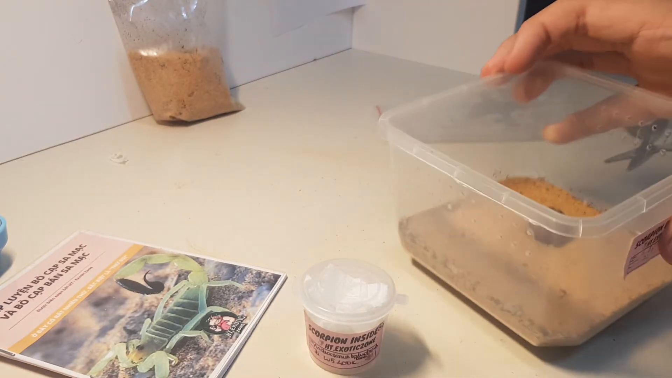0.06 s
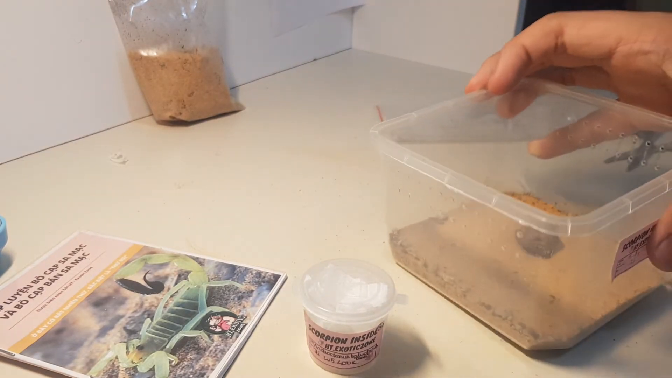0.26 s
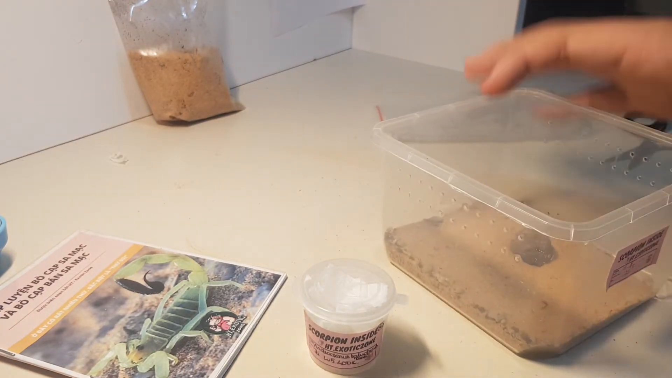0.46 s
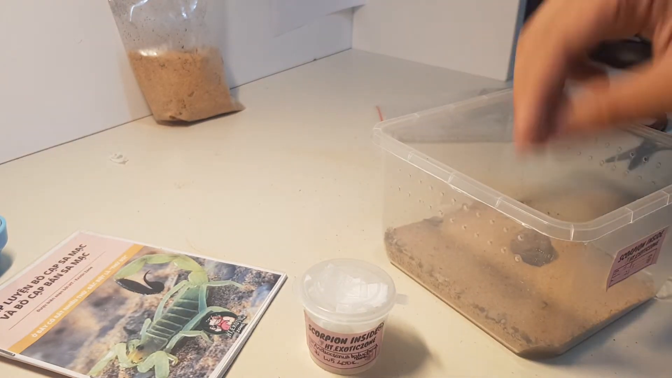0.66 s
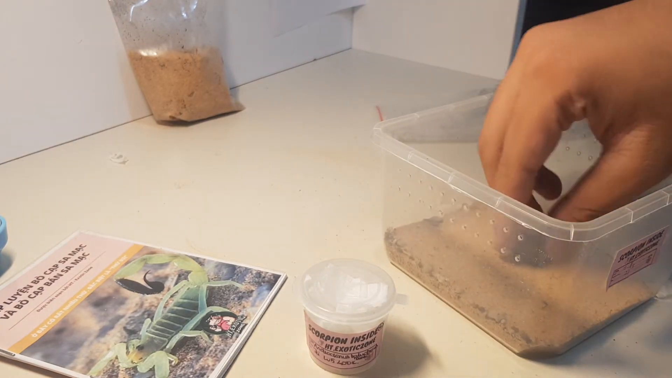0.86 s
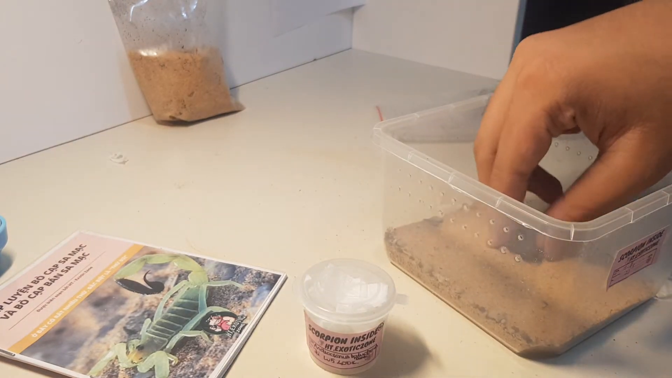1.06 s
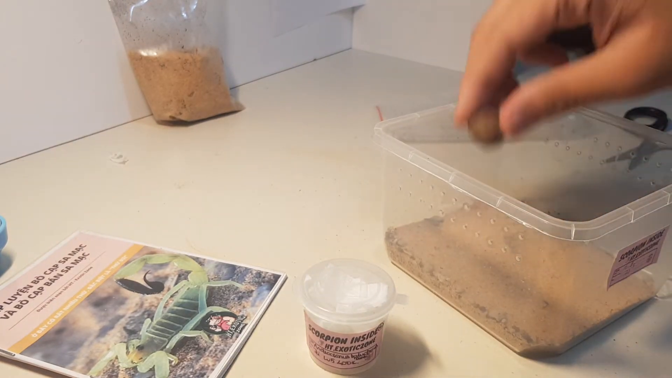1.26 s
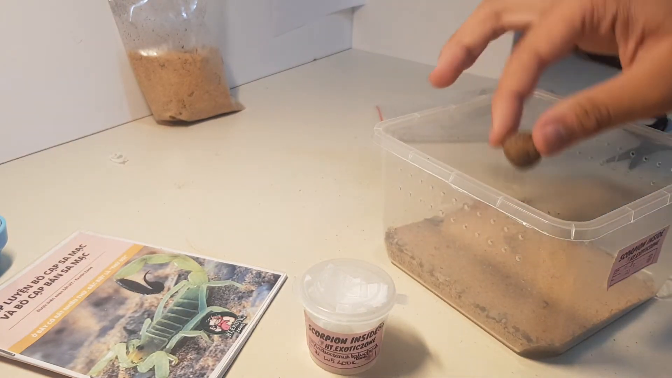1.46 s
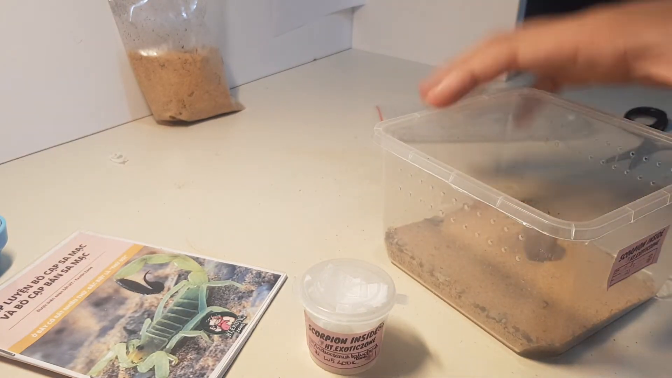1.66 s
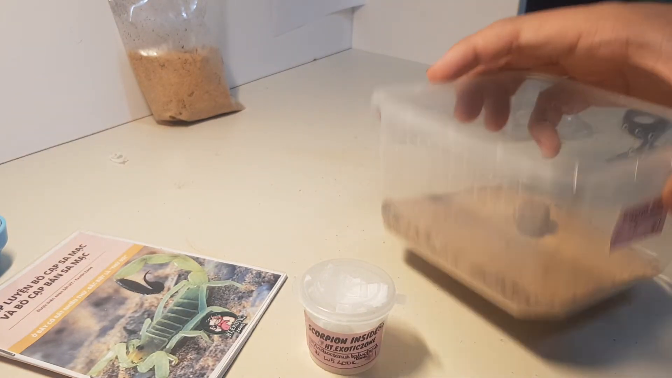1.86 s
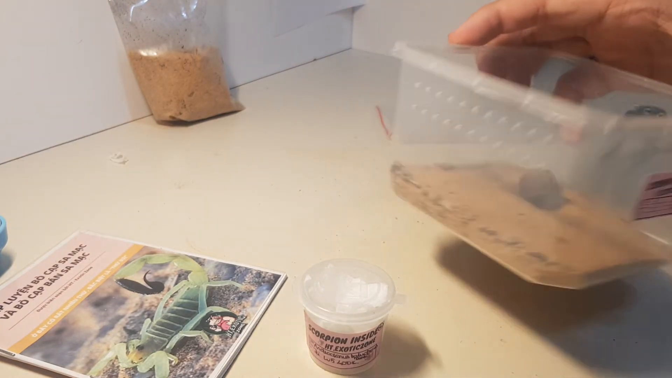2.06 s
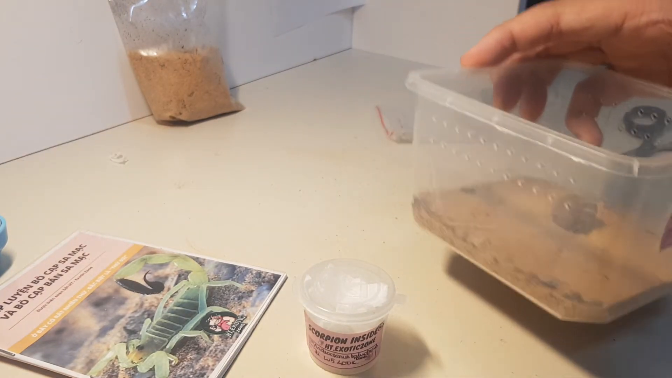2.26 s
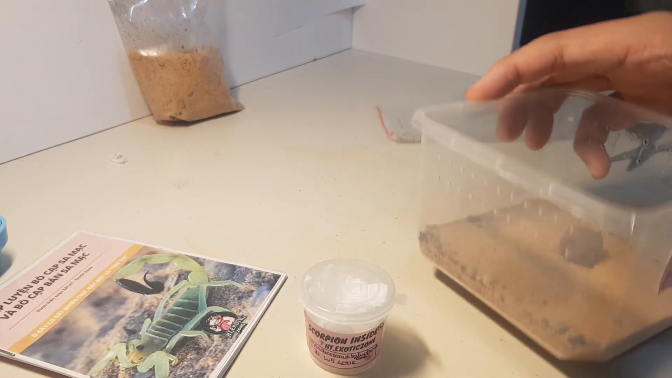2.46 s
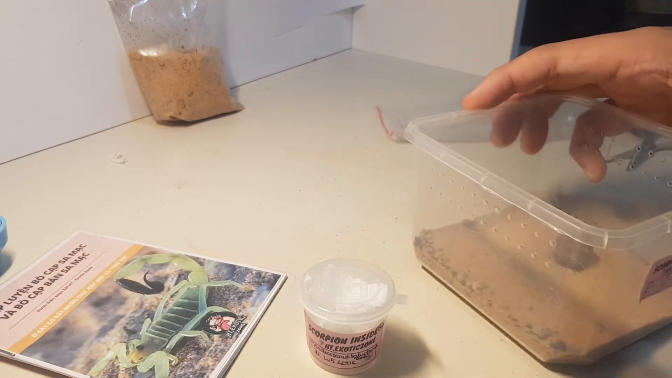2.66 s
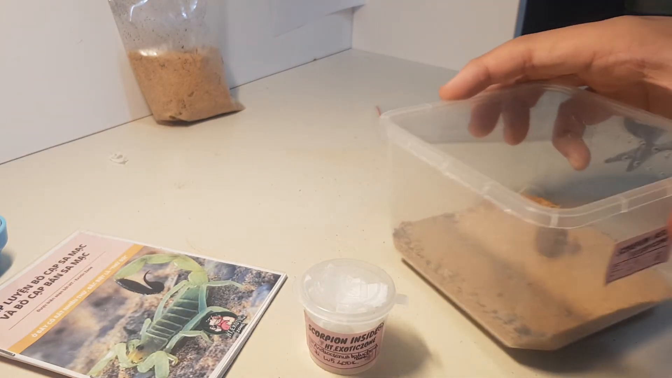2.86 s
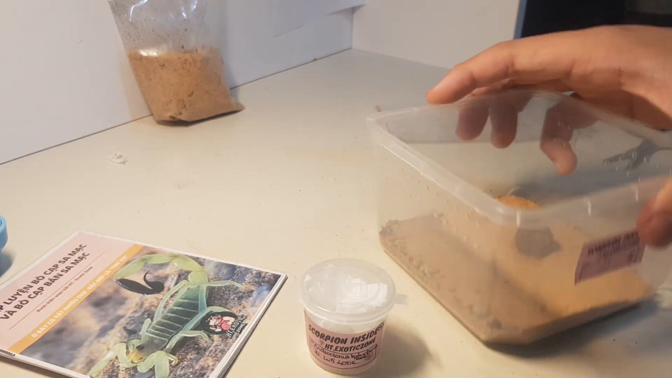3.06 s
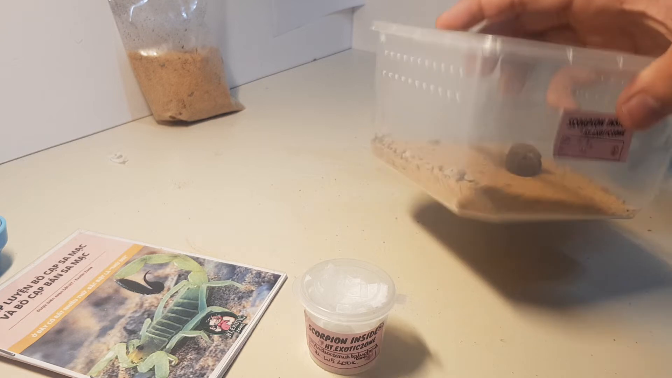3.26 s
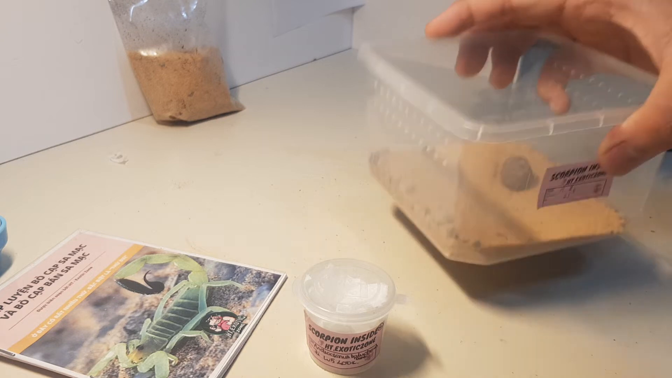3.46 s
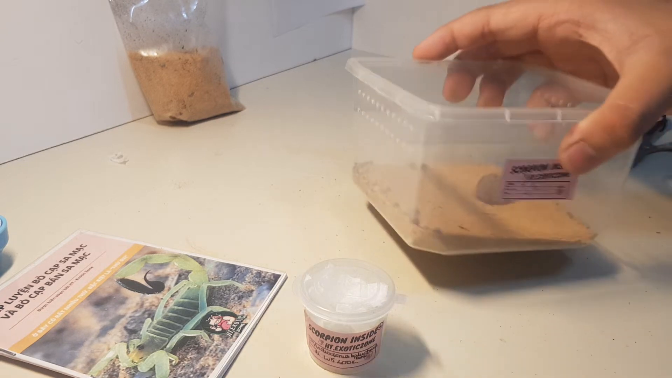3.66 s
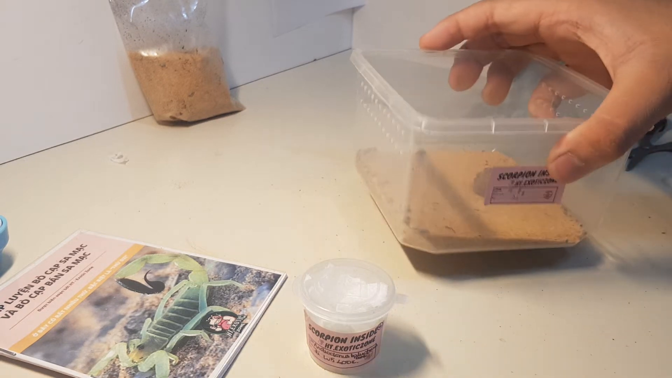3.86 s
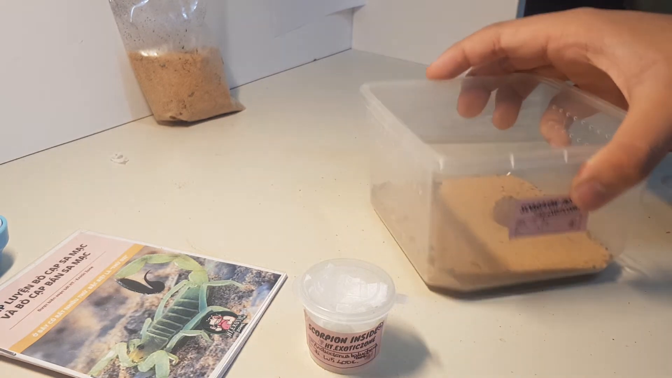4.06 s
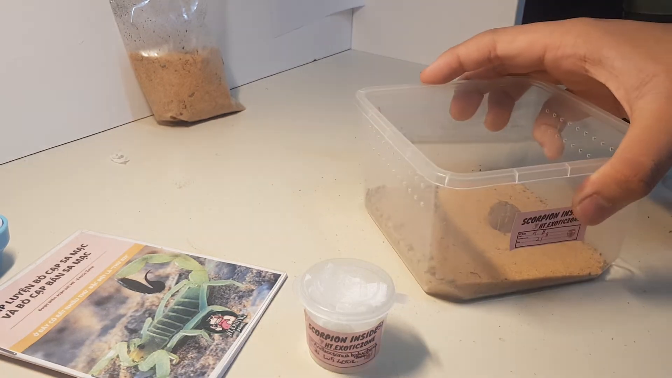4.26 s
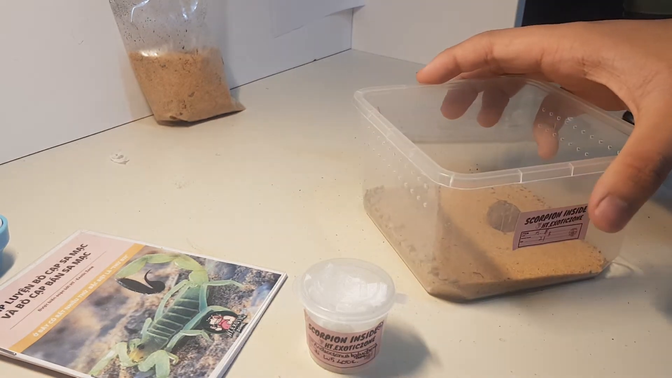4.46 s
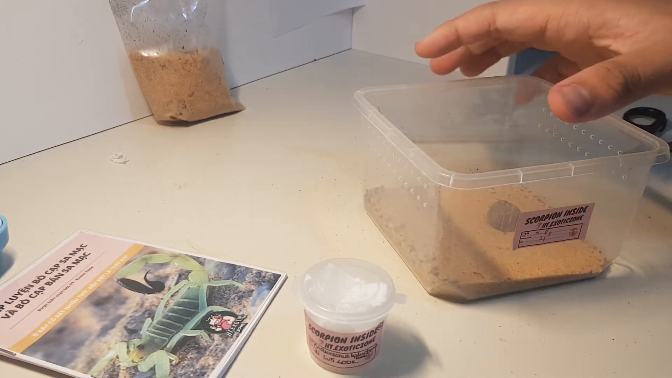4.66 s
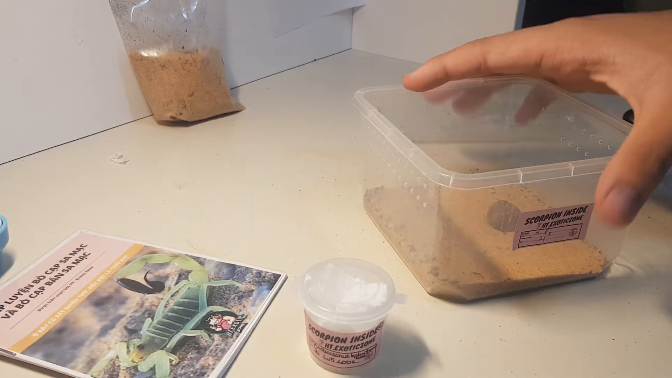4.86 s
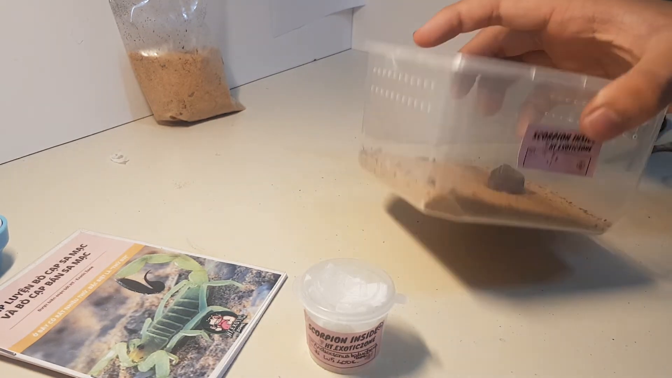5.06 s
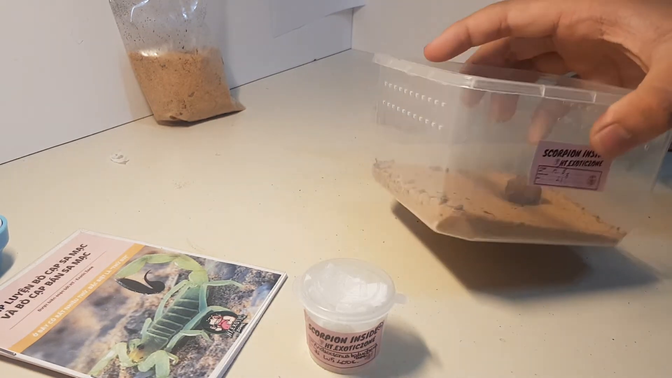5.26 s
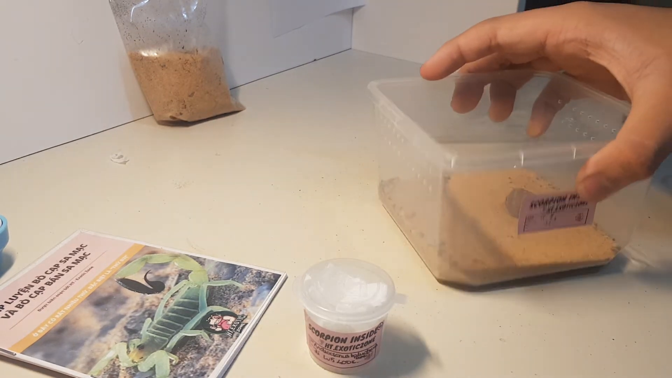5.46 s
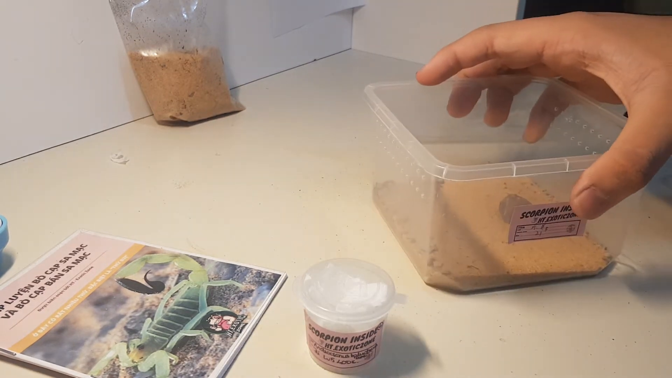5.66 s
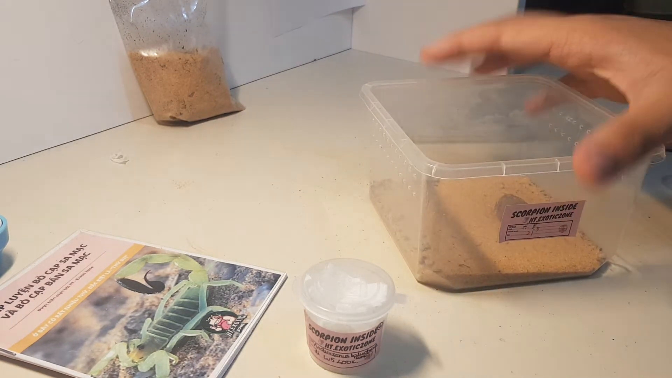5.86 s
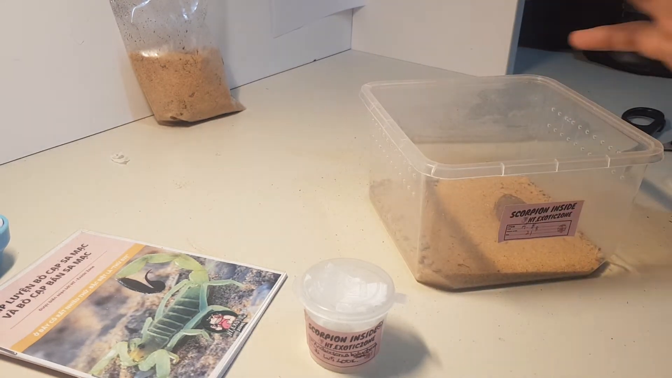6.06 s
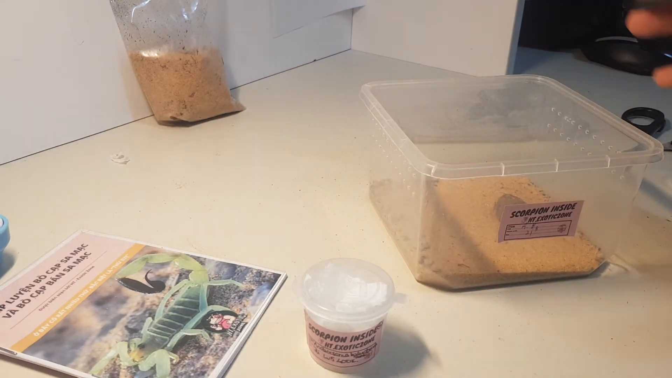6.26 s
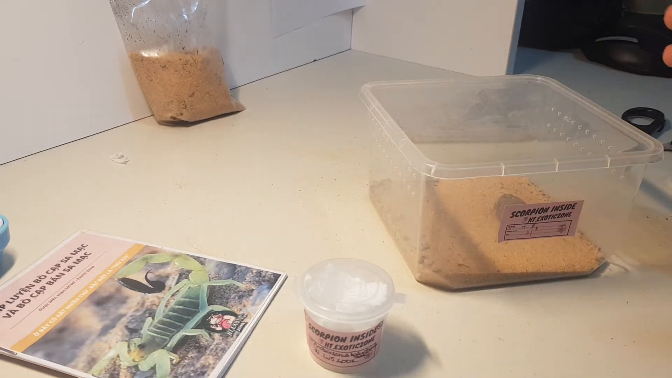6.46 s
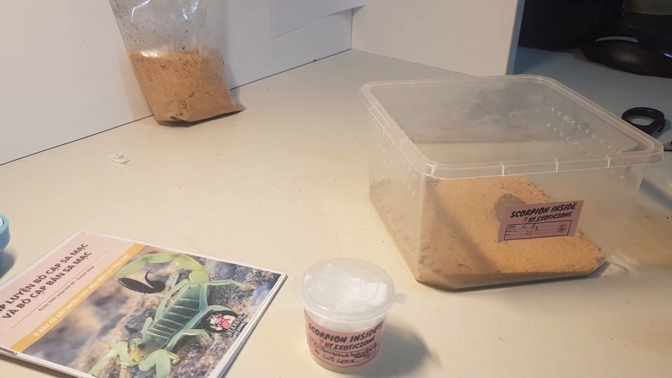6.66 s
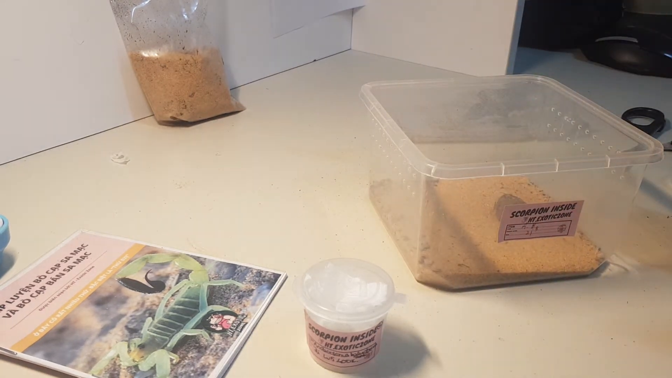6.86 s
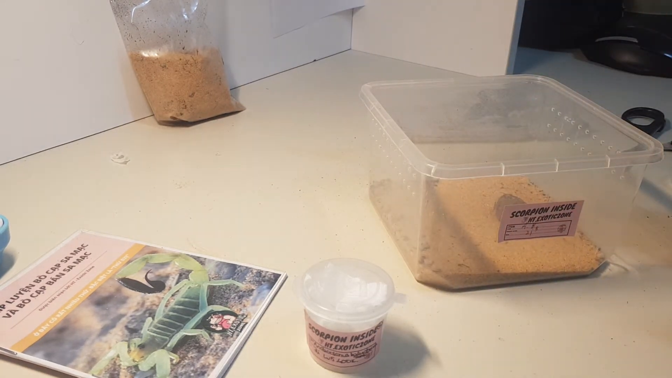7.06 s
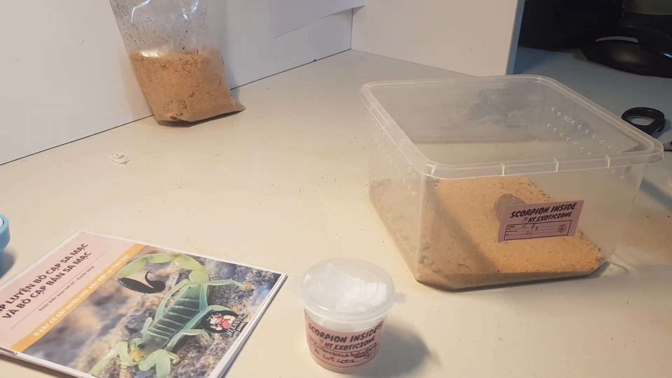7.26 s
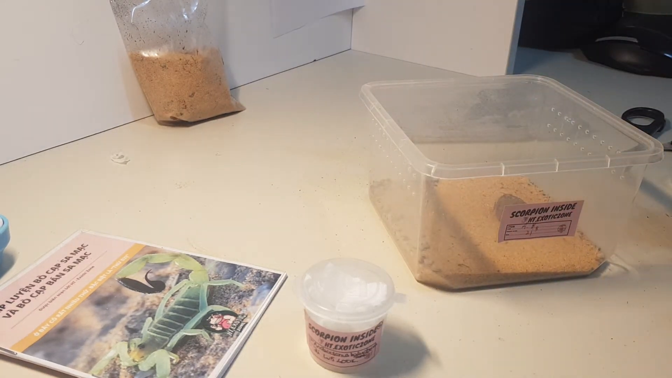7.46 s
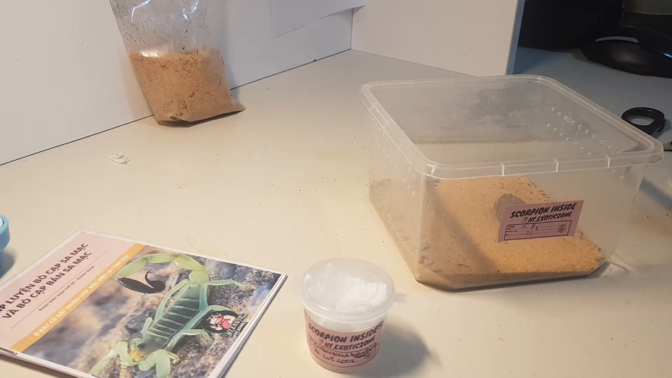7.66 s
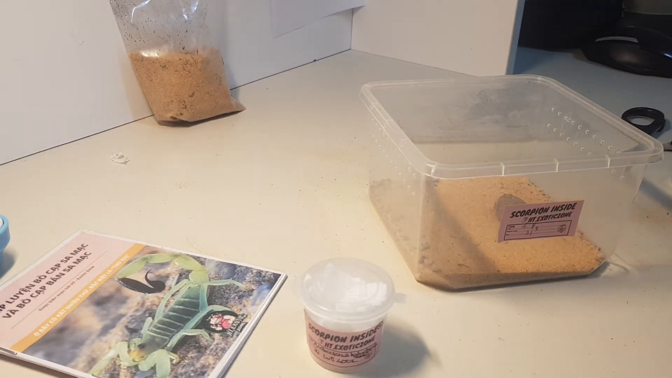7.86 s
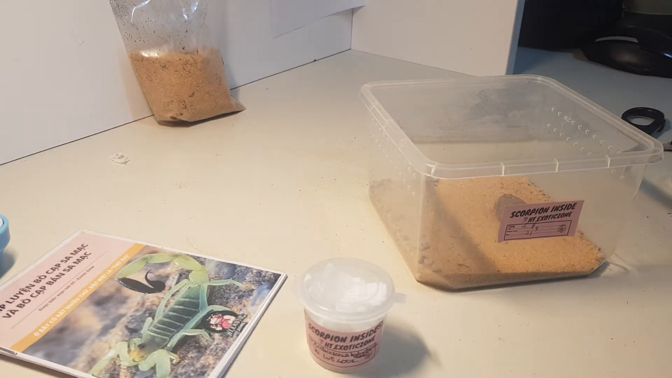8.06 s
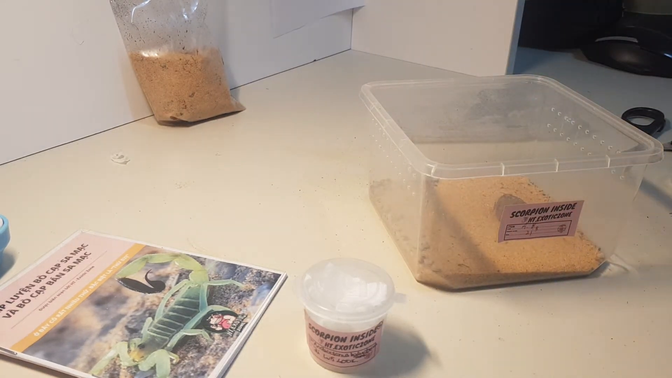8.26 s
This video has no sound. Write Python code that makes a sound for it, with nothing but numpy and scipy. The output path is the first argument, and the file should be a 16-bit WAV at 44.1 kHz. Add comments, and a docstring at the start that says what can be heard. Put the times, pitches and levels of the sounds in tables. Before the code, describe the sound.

Hollow knocks and small rim clicks from a plastic tub of sand moved around a desk, with mains hum and a fan behind.

```python
"""A thin plastic tub with a little sand in it is lifted, turned and set down on a desk in a small room.
Its base knocks, ringing the walls and the air inside; its rim clicks and scrapes under the fingers
and the sand trickles. A few dry ticks, a scuff and later soft bumps on the desk are heard too.
The tub sits just right of centre in the stereo pair, with quick reflections and a short room tail.
Mains hum and a small fan drone steadily behind, over a faint low rumble."""
import sys
import numpy as np
from scipy import signal
from scipy.fft import rfft, irfft
from scipy.io import wavfile

SR = 44100
rng = np.random.default_rng(int(sys.argv[2]) if len(sys.argv) > 2 else 0)


def transcribe(signal):
    """Save signal, clipped to [-1, 1], as a 16-bit WAV file at the path in sys.argv[1]."""
    frames = np.atleast_2d(signal).T
    limited = np.clip(frames, -1, 1)
    pcm = np.round(limited * 32767).astype(np.int16)
    wavfile.write(sys.argv[1], SR, pcm)


N = 366459
TIME = np.arange(N) / SR

# The tub lands, rocks and bounces; later, soft bumps sound on the desk. Hardness is the ring of the
# walls over the thump of the desk; hollowness is the boom of the air in the tub. The thump's pitch
# depends on where the blow lands; the grip damps the ring or lets it run.
# start_s, strength_db, hardness_db, hollowness_db, thump_semitones, ring_length_factor
KNOCKS = [(0.2604, -20, 1.5, -4.5, 2.5, 0.58), (0.299, -41, -15, -10, 0.5, 0.78),
          (0.383, -31, -5, -3, 3, 0.94), (0.42, -38.5, -17, 4.5, -1, 1.8),
          (0.441, -31.5, 10, -5, -2.5, 1.8), (0.444, -26, -6, 9.5, -2, 1.26), (0.451, -36, -4, -4, -7, 0.9),
          (0.522, -41, -14, -8, 3, 0.86), (0.819, -37, -7, 3.5, -8, 0.81), (1.142, -44.5, -18, 6.5, 0, 1.4),
          (1.625, -42.5, -24, 4, -3.5, 1.4), (1.648, -47.5, -17, 10.5, -0.5, 0.9),
          (1.746, -35.5, 8, -19, 4, 1.5), (1.757, -31, -7, 3, 1.5, 0.73), (1.773, -33, -12, 3, 0, 0.68),
          (1.787, -41.5, 14, -6, 1, 2.3), (2.588, -36.5, -7, 9.5, -2, 1.45),
          (2.986, -21.5, -3, -0.5, 1.5, 1), (2.996, -24.5, -8.5, -21, -1, 0.85),
          (3.005, -34, 1, -9, 0.5, 1), (3.022, -31, -11, -4, -3, 0.84), (3.042, -39.5, -15, -1, 0.5, 0.8),
          (3.063, -41, -16, -10, 0.5, 1.4), (3.098, -49, -3, 3, -5, 1.5), (3.441, -45.5, 6, 4, -7, 1.4),
          (3.721, -51.5, 18, 1, -17, 2), (4.128, -31, -17.5, -19, 2, 0.85), (4.166, -29.5, -9, 0, 0, 1.05),
          (4.192, -40, -13, -7, 8.5, 0.85), (4.928, -41.5, -6, 4, -2, 1.7), (5.211, -47.5, 27, 6, 5, 0.84),
          (5.381, -46.5, 16, -10, -11, 0.9), (5.53, -12.5, 1, -4, 0.5, 0.78),
          (5.539, -32.5, 1, 6, -2, 0.77), (5.552, -35, 3, 4, 2, 1), (5.567, -36, -12, -8, -0.5, 1.2),
          (5.591, -49, 5, -9, 3, 1), (5.609, -32, -20, -1, 1.5, 0.8), (5.64, -36, -20, -13, -3, 1.1),
          (5.662, -39.5, -26, 7.5, 2, 0.78), (5.679, -41, -23, -13, -1, 1),
          (5.876, -43, -14, -3, 4.5, 0.41), (6.399, -41, -14, -2, -4, 2.5), (6.437, -50, -14, 6, 2.5, 1.7),
          (6.48, -44, -3, 2, -7, 1.6), (6.733, -42.5, -10, 11, -4, 0.89), (6.752, -42.5, -24, -6, -10, 3.4),
          (7.557, -48, -5, 7, 1, 1.5), (7.844, -44.5, -13, 5, -6, 0.95), (8.097, -44, -8, 0.5, 2.5, 1.65)]
# Modes of the tub's base and thin walls: pitch_hz, gain_db, t60_s
BASE = [(500, -1, 0.025), (542.5, 7, 0.028), (635, 1.5, 0.028), (704, 0.5, 0.026)]
WALLS = [(740, 16, 0.039), (902, 9, 0.05), (892.5, 26, 0.032), (935, 24.5, 0.039), (1050, 12, 0.008),
         (1136, 12, 0.018), (1310, 8, 0.018), (1560, 8.5, 0.012), (1850, 6, 0.034), (1940, 7, 0.018),
         (2340, -1, 0.012), (3030, -16, 0.014)]
# Resonances of the rim, midrange and top end: pitch_hz, width_hz, gain_db
RIM = [(1000, 780, -10.5), (1840, 800, 0.5), (3230, 290, -0.5), (3960, 930, -4.5), (6590, 1640, -7.5)]
RIM_TOP = [(10840, 1830, 12.6), (13100, 2300, 11.5), (14700, 2400, 4.8)]


def knocks(low_cut_hz=128, hard_blow_db=-20):
    """The walls and base answer at once; the heavier desk and the enclosed air swell a little later."""
    # Modes of the desk and of the air in the tub: pitch_hz, gain_db, t60_s
    desk = [(159, 5.5, 0.063), (186, 10.5, 0.04), (206.7, 12, 0.043), (251, 4.5, 0.036), (304, -2.5, 0.027)]
    tub_air = [(362, 3, 0.023), (427, -10.5, 0.025)]
    out = np.zeros((2, N))
    for start_s, db, hardness_db, hollowness_db, thump_semitones, ring_length in KNOCKS:
        # modes, level_db, rise_s, left_db, shift_semitones
        parts = [(desk, db - hardness_db / 2, 0.003, -1, thump_semitones),
                 (tub_air, db + hollowness_db, 0.005, -5, 0),
                 (BASE, db + 3 + 0.2 * hollowness_db, 0.0015, -3, 0),   # shares part of the boom
                 (WALLS, db + hardness_db / 2, 0.0011, -2, 0)]
        for modes, level_db, rise_s, left_db, semitones in parts:
            tilt_db = max(level_db - hard_blow_db, 0)   # a hard blow is brighter
            ring = struck(modes, rise_s, tilt_db, semitones, ring_length)
            add(out, start_s, -from_db(level_db) * panned(left_db) * ring)
    return butter(out, 4, low_cut_hz, "high")   # so small a box radiates no deep bass


def struck(modes, rise_s, tilt_db_per_octave, semitones, ring_length, flex_sharp=0.031, flex_s=0.01):
    """One blow on a part: every mode rings with a strength of its own and sags in pitch; peak 1."""
    t = TIME[:SR // 6]
    hz, db, t60_s = np.transpose(modes)[:, :, None]
    strength, mistune, lean, lead = rng.standard_normal((4, len(modes), 1))
    db = db + 3 * strength + tilt_db_per_octave * np.log2(hz / hz[0])
    grip = 0.021 * rng.uniform(-1.07, 1)   # the grip tightens or slackens the whole part
    hz = hz * 2 ** (semitones / 12) * (1 + 0.01 * mistune + grip)
    # a dented wall starts sharp and relaxes
    phase = 2 * np.pi * hz * (t + flex_sharp * flex_s * (1 - np.exp(-t / flex_s)))
    # each mode reaches the two microphones unevenly
    sides = np.array([1, -1])[:, None, None]
    side_db = 1.3 * sides * lean
    side_rad = 0.42 * sides * lead * hz / 1000
    envelopes = from_db(db + side_db - 60 * t / (t60_s * ring_length))
    ring = np.sum(envelopes * np.sin(phase + side_rad), axis=1) * (1 - np.exp(-t / rise_s))
    return ring / np.abs(ring).max()


def clicks(rise_s=0.00043, attack_s=0.003):
    """Each snap is a jagged crack that crumbles away over a few milliseconds, coloured by the rim."""
    # Snaps of the rim under the fingers: start_s, strength_db, brightness_db, decay_s
    snaps = [(0.3809, -39.5, -2.5, 0.0014), (0.4365, -49, -12, .003), (0.4425, -43.5, -4, 0.0022),
             (0.462, -57, -7, .002), (0.483, -54, -3, .002), (1.08, -49.5, -5, 0.0018),
             (1.13, -48.5, -4, 0.0034), (1.7452, -43, -5, 0.0035), (1.753, -41, -6, .0015),
             (1.762, -46, -7, 0.0053), (1.768, -39.5, -7, 0.0048), (1.7773, -47, -6, .003),
             (1.7816, -42, -5, 0.0017), (2.986, -52, -14, 0.0023), (2.991, -45, -4, .003),
             (3.004, -45.5, -4, 0.0014), (3.009, -43.5, -4, 0.0023), (3.036, -39.5, -1.5, 0.0023),
             (3.0661, -43.5, -4, 0.0019), (3.469, -45.5, -21, .0012), (4.183, -52, -8, .002),
             (4.9254, -38.5, -4.5, 0.0022), (5.342, -49.5, -19, 0.0027), (5.6342, -44, -7, .002),
             (5.635, -36, -8, 0.0021), (5.644, -44, -9, .0025), (5.649, -39, -12, 0.0029),
             (5.6522, -39, -11, .004), (5.6692, -34.5, -2, .0022), (5.673, -43, -9, 0.0017),
             (5.703, -49, -10, 0.0018), (5.849, -60, 1, .002), (6.733, -49, -2, .0014)]
    # every knock also cracks the rim, well below the ring of the walls
    cracks = [(start_s, db + hardness_db / 2 - 25, -17, 0.0015) for start_s, db, hardness_db, *_ in KNOCKS]
    out, t = np.zeros((2, N)), TIME[:SR // 20]
    for start_s, db, brightness_db, decay_s in snaps + cracks:
        burst = rng.laplace(size=(2, len(t))) * (1 - np.exp(-t / rise_s)) * np.exp(-t / decay_s)
        for resonances, band_db in ((RIM, 1), (RIM_TOP, 2 + brightness_db)):
            ring = resonate(burst, resonances)
            attack_rms = np.sqrt(np.mean(ring[:, t < attack_s] ** 2))
            add(out, start_s, from_db(db + band_db) * panned(-2) * ring / attack_rms)
    return out


def ticks():
    """Small, dry ticks, a few of them thin and pitched."""
    # Brief bursts of band noise: start_s, pitch_hz, width_hz, level_db, decay_s
    small_ticks = [(3.440, 1400, 1280, -44, 0.0076), (3.721, 1500, 1300, -47, .005),
                   (4.538, 3660, 500, -47.5, 0.01), (5.382, 1650, 700, -46, 0.0086),
                   (5.85, 3220, 503, -41.5, 0.0052)]
    out, t = np.zeros((2, N)), TIME[:SR // 20]
    for start_s, hz, width_hz, db, decay_s in small_ticks:
        ring = rms_one(resonate(rng.standard_normal((2, len(t))), [(hz, width_hz, 0)]))
        add(out, start_s, from_db(db) * panned(-2) * ring * np.exp(-t / decay_s))
    return out


def scrapes():
    """Plastic rubs on plastic, skin or desk and makes the walls ring."""
    # Rubbing strokes: middle_s, half_length_s, level_db, brightness_db
    strokes = [(0.447, 0.0094, -47.5, -12), (0.51, 0.081, -59.5, -15), (1.768, 0.031, -50.5, -5),
               (3.004, 0.018, -53, -9), (3.462, 0.04, -59, -10), (3.745, 0.027, -64, -6),
               (3.8, 0.028, -65, -12), (4.04, 0.022, -57.5, -24), (4.19, 0.045, -62, -5),
               (5.338, 0.12, -67, -3), (5.656, 0.062, -54, -6)]
    return friction(strokes, wall_db=5, slips_per_s=4500)


def sand():
    """Sand trickles over the base, too light to stir the walls much."""
    # Runs of grains: middle_s, half_length_s, level_db, brightness_db
    trickles = [(0.91, 0.076, -77, 6), (1.11, 0.093, -65, 0.5), (2.1, 0.046, -74, 6), (2.18, .03, -76, 8),
                (2.255, .02, -59, -7), (3.37, 0.097, -70.5, -0.5)]
    return friction(trickles, wall_db=-19, slips_per_s=900)


def friction(strokes, wall_db, slips_per_s, mode_width_hz=130):
    """Dense tiny slips come in uneven clumps and excite the rim, the walls and the base."""
    sizes = from_db(2.5 * np.minimum(rng.exponential(1, N), 4))
    slips = rms_one((rng.random(N) < slips_per_s / SR) * sizes * rng.standard_normal((2, N)))
    clumps = rms_one(from_db(2.5 * drift(rate_hz=40)))
    # rubbing stirs the modes more evenly than a blow
    rubbed_modes = [(hz, mode_width_hz, 0.71 * db) for hz, db, _ in BASE + WALLS]
    body = rms_one(resonate(slips.sum(axis=0), rubbed_modes))
    rub = rms_one(resonate(slips, RIM)) + from_db(wall_db) * body
    top = rms_one(resonate(slips, RIM_TOP))
    out = 0
    for middle_s, half_length_s, db, brightness_db in strokes:
        motion = np.exp(-np.abs((TIME - middle_s) / half_length_s) ** 3)
        out = out + from_db(db) * motion * (rub + from_db(brightness_db) * top)
    return panned(-2) * clumps * out


def scuff(start_s=6.357, level_db=-38.5, attack_s=0.012, hold_s=0.045, release_s=0.025, sag_db_per_s=104):
    """Something soft drags across the desk and makes it groan, sinking a little in pitch as it slows."""
    # Resonances of the rubbed desk: pitch_hz, width_hz, gain_db
    desk_ring = [(168, 30, -6.5), (358, 42, -8), (590, 36, -6), (1110, 1200, -26)]
    held_s = TIME - start_s - attack_s
    contact = np.clip(1 + held_s / attack_s, 0, 1) * np.clip(1 - (held_s - hold_s) / release_s, 0, 1)
    pressure = contact * from_db(level_db - sag_db_per_s * np.maximum(held_s, 0))
    drag = butter(rng.standard_normal(N), 2, 1200, "low")
    speed = 1 - 0.7 * np.clip(held_s, 0, hold_s + release_s)
    groan = np.interp(np.cumsum(speed) / SR, TIME, rms_one(resonate(drag, desk_ring)))
    return panned(-2) * pressure * groan


def with_reflections(direct):
    """The direct sound, with nearby surfaces repeating every contact within a few milliseconds."""
    # Bounces off the desk and the wall behind: delay_s, gain_db
    reflections = [(.0019, -31), (.0048, -15.5)]
    out = direct.copy()
    for delay_s, db in reflections:
        add(out, delay_s, from_db(db) * direct)
    return out


def room_tail(direct, first_echo_s=0.0002, build_s=0.00017):
    """The small room's diffuse echoes build up almost at once and linger longest in the bass."""
    # Reverberation of the room: band_hz, gain_db, t60_s
    reverberation = [(131, -2.5, 0.66), (251, -3, 0.36), (500, -5, 0.24), (1000, -10, 0.37),
                     (2020, -3, 0.23), (3500, -5, 0.32), (8000, -6.5, 0.2), (15000, -6, 0.3)]
    t, response = TIME[:SR * 3 // 4], 0
    swell = 1 - np.exp(-np.maximum(t - first_echo_s, 0) / build_s)
    for hz, noise in diffuse_bands(len(t)):
        fade = swell * from_db(-60 * t / at_hz(reverberation, hz, column=2))
        response = response + from_db(at_hz(reverberation, hz)) * noise * fade / np.linalg.norm(fade)
    return signal.fftconvolve(direct, response, axes=1)[:, :N]


def hum(waver_db=0.8, wander_rad=0.15, drift_hz=1.2):
    """Mains and fan tones waver slightly in strength and pitch; close pairs beat."""
    # Steady tones behind the tub: pitch_hz, rms_db, left_db
    tones = [(59, -68, 0), (97.6, -63, 0), (100, -54.5, 0), (146, -66, 0), (184, -70, 0), (200, -58, 0),
             (207, -68, 0), (248.4, -70, -2), (357.7, -58.5, -3), (373.9, -61.5, -5), (416, -74, -4),
             (441, -73, -4), (457.6, -68.5, -6), (558, -74, -4), (715.5, -67, -3), (766.5, -75, -7),
             (817.7, -71, -7), (915, -74.5, -5), (1788, -72.5, -4)]
    out = 0
    for hz, db, left_db in tones:
        phase = 2 * np.pi * (hz * TIME + rng.random()) + wander_rad * drift(wander_rate := drift_hz)
        amplitude = np.sqrt(2) * from_db(db + waver_db * drift(drift_hz))
        out = out + panned(left_db) * amplitude * np.sin(phase)
    return out


def fan_rush(trim_db=-1.5):
    """The even rush of the fan, a little to the right."""
    # Spectrum of the fan and room, and of the hiss above it, ahead of the trim: band_hz, density_db
    rush = [(25, -103), (38, -84), (52, -94), (80, -89), (110, -78), (200, -76.5), (280, -81.5),
            (350, -78.5), (480, -86), (660, -89), (810, -82), (950, -85), (1130, -91), (1850, -84.5),
            (2200, -95.5)]
    hiss = [(3600, -96), (4400, -95), (6800, -99), (8300, -113), (11500, -111), (16000, -115)]
    # Balance between the microphones: band_hz, left_db
    balance = [(60, 9), (110, 0), (200, -0.5), (380, -6.5), (700, -5), (1290, -5.5), (2380, -6), (4400, -5),
               (8120, 0), (15000, -21.5)]
    spectrum = rfft(sum(band for _, band in diffuse_bands(N)))
    hz = np.maximum(np.fft.rfftfreq(N, 1 / SR), 1)
    level_db = trim_db + at_hz(rush + hiss, hz) + at_hz(balance, hz) * [[0.5], [-0.5]]
    return irfft(spectrum * from_db(level_db), N) * np.sqrt(SR / 2)


def rumble(band_hz=(45, 68), trim_db=-1):
    """A faint low rumble that comes and goes."""
    # Rise and fall of the rumble, ahead of the trim: time_s, level_db
    swells = [(0.0, -54), (0.42, -71), (0.46, -58), (0.62, -82), (0.81, -57), (1.09, -55), (1.41, -75),
              (1.83, -60), (1.92, -72), (2.38, -55.5), (3.61, -63), (4.04, -55), (4.32, -62), (6.33, -72),
              (6.45, -63), (7.44, -80), (7.79, -62), (8.3, -69)]
    noise = rms_one(butter(rng.standard_normal(N), 2, band_hz, "band"))
    return from_db(trim_db + np.interp(TIME, *np.transpose(swells))) * noise


def diffuse_bands(size):
    """Third-octave bands of noise, each with its own likeness between left and right."""
    # How alike the two microphones hear the room: band_hz, correlation
    likeness = [(60, 0.029), (130, 1), (290, 0.79), (640, 0.27), (1410, 0.12), (3100, 0.21), (6820, -0.076),
                (15000, 1)]
    edges_hz = 22 * 2 ** (np.arange(30) / 3)
    white = rng.standard_normal((2, 2, size))
    for k, (low_hz, high_hz) in enumerate(zip(edges_hz, edges_hz[1:])):
        mid, side = butter(white[k % 2], 3, [low_hz, high_hz], "band")
        hz = np.sqrt(low_hz * high_hz)
        alike = np.clip(at_hz(likeness, hz), 0, 0.995)
        yield hz, np.sqrt((1 + alike) / 2) * mid + np.sqrt((1 - alike) / 2) * side * [[1], [-1]]


def resonate(x, resonances):
    """Parallel resonances of alternating sign."""
    out = 0
    for k, (hz, width_hz, db) in enumerate(resonances):
        r = np.exp(-np.pi * width_hz / SR)
        ring = signal.lfilter([1, 0, -1], [1, -2 * r * np.cos(2 * np.pi * hz / SR), r * r], x + 1e-18)
        out = out + (-1) ** k * from_db(db) * (1 - r * r) / 2 * ring
    return out


def drift(rate_hz, step=40, settle=2000):
    """A slow random wander of spread 1."""
    r = np.exp(-2 * np.pi * rate_hz * step / SR)
    slow = signal.lfilter([1], [1, -2 * r, r * r], rng.standard_normal(N // step + settle + 2))[settle:]
    return np.interp(np.arange(N) / step, np.arange(len(slow)), rms_one(slow))


def butter(x, order, hz, kind):
    return signal.sosfilt(signal.butter(order, hz, kind, fs=SR, output="sos"), x + 1e-18)


def from_db(db):
    return 10 ** (np.asarray(db) / 20)


def rms_one(x):
    return x / np.sqrt(np.mean(x ** 2) + 1e-20)


def at_hz(table, hz, column=1):
    """Reads one column of a table on a log-frequency axis."""
    table = np.array(table)
    return np.interp(np.log(hz), np.log(table[:, 0]), table[:, column])


def panned(left_db):
    """Stereo gains that put the left channel left_db above the right."""
    return from_db(np.array([[left_db], [-left_db]]) / 2)


def add(track, start_s, sound):
    """Mixes a sound in at a given time."""
    start = max(round(start_s * SR), 0)
    track[..., start:start + sound.shape[-1]] += sound[..., :N - start]


def scene():
    """The handled tub, heard directly and through the room, over the steady background."""
    direct = scrapes() + sand() + knocks() + clicks() + ticks() + scuff()
    return with_reflections(direct) + room_tail(direct) + hum() + fan_rush() + rumble()


def record(dry):
    """The top is cut steeply above 16 kHz."""
    return signal.sosfilt(signal.ellip(10, 0.2, 70, 16000, fs=SR, output="sos"), dry)


dry = scene()
out = record(dry)
transcribe(out)
```